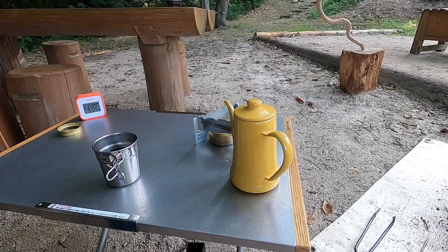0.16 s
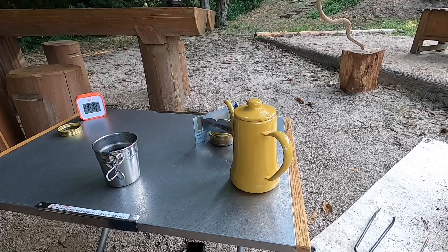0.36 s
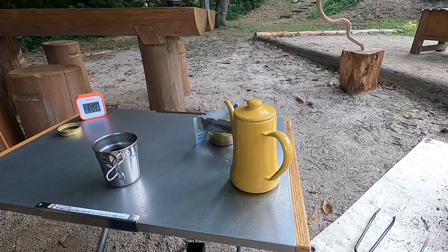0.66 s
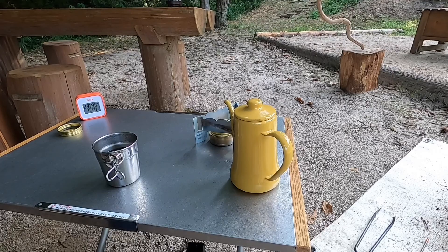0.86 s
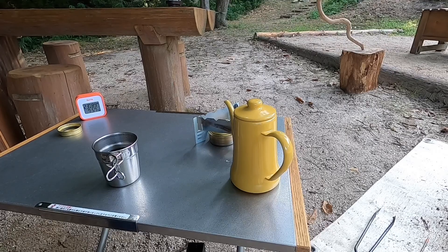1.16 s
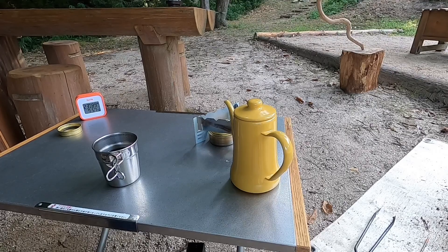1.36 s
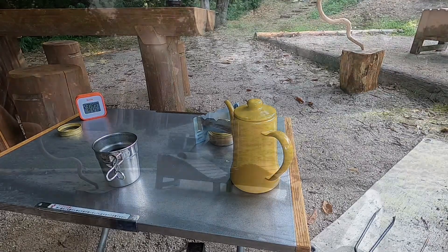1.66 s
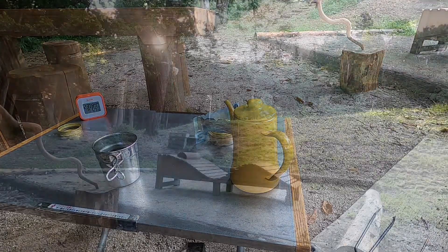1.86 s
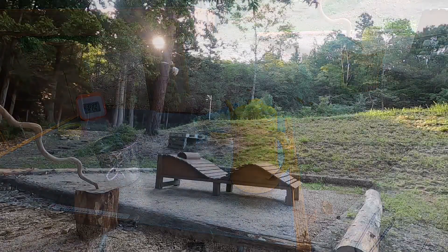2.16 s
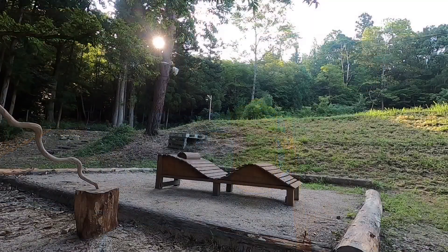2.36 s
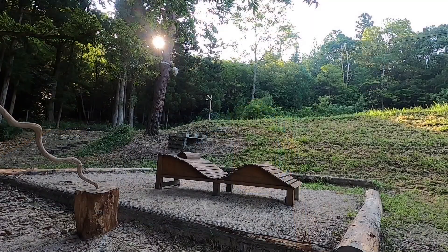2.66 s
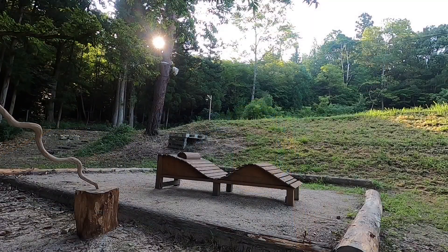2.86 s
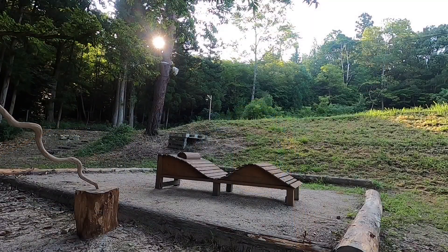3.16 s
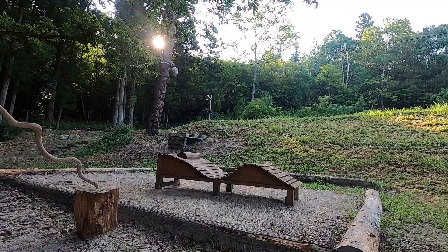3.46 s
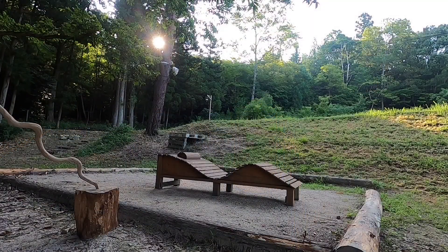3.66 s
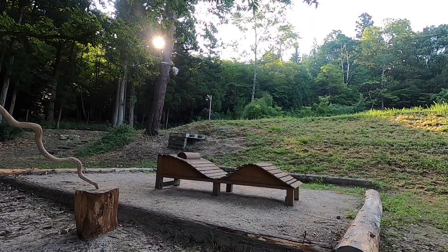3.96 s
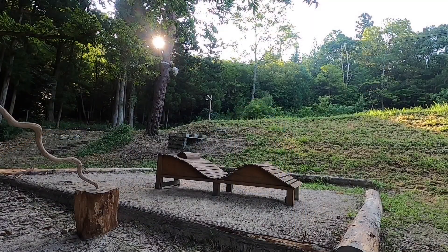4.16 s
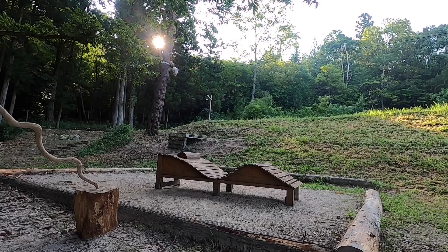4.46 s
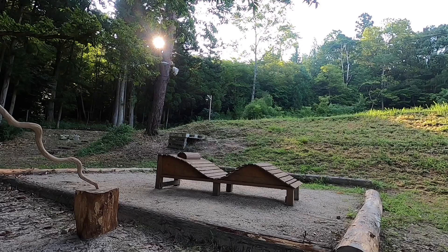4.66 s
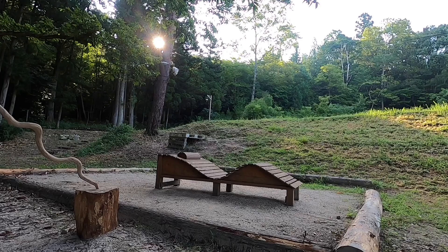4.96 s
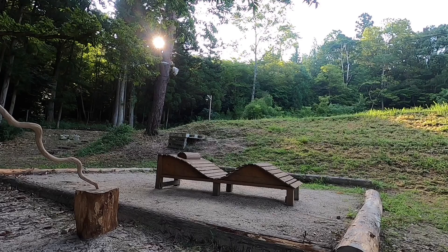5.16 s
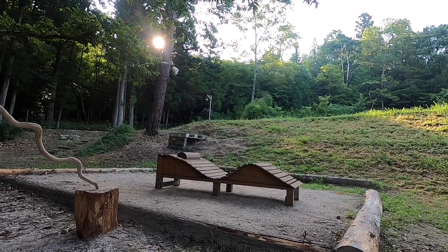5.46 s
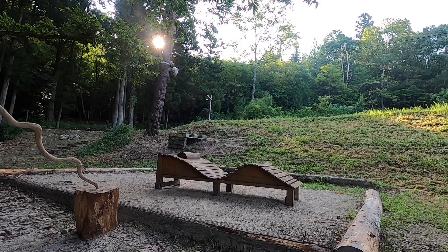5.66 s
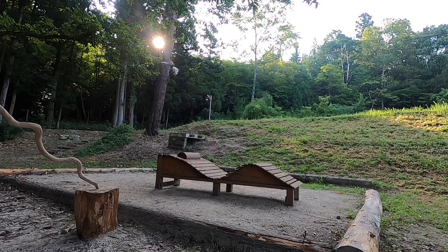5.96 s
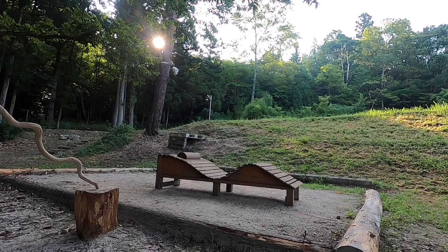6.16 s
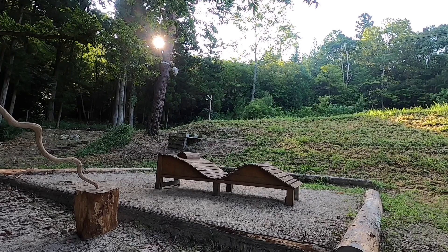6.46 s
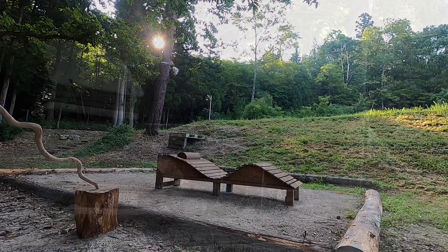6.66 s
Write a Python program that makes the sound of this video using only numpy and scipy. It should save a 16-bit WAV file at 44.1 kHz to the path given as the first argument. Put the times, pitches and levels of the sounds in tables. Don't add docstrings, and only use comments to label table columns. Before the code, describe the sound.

Outdoors in the woods, a dense, high cicada chorus fills the stereo field, with near insects rasping and surging several times a second. It crossfades to a steadier, slightly softer chorus. On the camera microphone a hand makes dry creaks and rubs, mostly left, over deep swaying rumble, while a distant bird whistles short thin chirps.

```python
import sys
import numpy as np
from scipy import signal
from scipy.fft import rfft, irfft
from scipy.io import wavfile
from scipy.ndimage import uniform_filter1d

SR = 44100
rng = np.random.default_rng(int(sys.argv[2]) if len(sys.argv) > 2 else 0)


def volts(x):
    e = np.asarray(x, float) / 20
    return 10 ** e


def to_wav(s):
    ch = np.atleast_2d(s).T
    pcm = np.round(np.clip(ch, -1, 1) * 32767)
    wavfile.write(sys.argv[1], SR, pcm.astype(np.int16))


N = 299880
T = np.arange(N) / SR

# (time [s], share of the table [0-1], share of the clearing [0-1])
DISSOLVE = [
    (0, 1, 0.049),
    (1.4, 1, 0.27),
    (1.9, 0.58, 0.29),
    (2.4, 0.0097, 0.53),
    (6.8, 0.013, 0.96),
]


def table():
    # (time [s], level [dB])
    effort = [
        (0, -25),
        (1.4, -24.5),
        (2.4, -27.5),
    ]
    # (frequency [Hz], level [dB per Hz])
    chorus_colour = [(1760, -64.5), (3000, -60), (3540, -28), (4780, -8.5), (5230, -14.5), (5680, -9),
                     (6740, -6), (7070, -3), (7580, -2), (8000, -1), (8810, -5.5), (10000, -27),
                     (12900, -24), (14700, -32), (15500, -31.5)]
    # (frequency [Hz], level [dB per Hz])
    air_colour = [(12, -40), (20, -5), (40, 0), (59, -29), (92, -40), (119, -18), (161, -6.5), (787, -18.5),
                  (936, -17.5), (1160, -14), (1920, -15.5), (2330, -11), (3600, -16.5), (4680, -41),
                  (7920, -120)]
    # (frequency [Hz], likeness [0-1])
    likeness = [(60, 0.61), (100, 0.24), (180, 0.25), (310, 0.028), (550, 0.14), (950, 0.48), (1650, 0.13),
                (2860, 0.12), (4970, 0.14), (6800, 0.18), (7100, 0.77), (15000, 0.36)]
    # (body [Hz], width [Hz], clicks [per s], evenness [0-1], throbs [per s],
    # first throb [s], throb depth [dB], level [dB])
    singers = [
        (5490, 230, 80, .02, 13.5, 0.084, 19, -37.5),
        (2375, 65, 140, 0.4, 13.5, 0.048, -6, -59),
        (7750, 900, 160, 0, 29, 0.057, 7.5, -33),
    ]
    surging_singers = [
        (4596, 270, 100, 0.83, 11, 0.083, 3.5, -39),
        (5080, 250, 130, 0.52, 14, 0.12, -9, -35.5),
        (5950, 1470, 230, 0.24, 11, 0.062, 1.5, -29),
    ]
    # (start [s], end [s], level [dB])
    surges = [(0.06, 0.15, -29), (0.237, 0.257, -28.5), (.38, .43, -31), (0.548, 0.622, -30),
              (0.76, 0.803, -30), (0.971, 0.983, -28), (1.12, 1.119, -27), (1.194, 1.305, -28.5),
              (1.387, 1.444, -30), (1.605, 1.651, -30), (1.768, 1.854, -33), (1.917, 1.944, -33.5)]
    chorus = volts(curve(effort) + 2.0) * crowd(chorus_colour, likeness, patchy_db=1.4)
    air = volts(-47) * crowd(air_colour, likeness, patchy_db=1.0)
    surge = swells(*np.transpose(surges), rise_db_per_s=87, fall_db_per_s=302).max(1)
    surge = smooth(np.maximum(surge, volts(-35)))
    surging = volts(29.5) * surge * sum(singer(*row) for row in surging_singers)
    return chorus + air + surging + sum(singer(*row) for row in singers)


def clearing():
    # (time [s], level [dB])
    effort = [
        (1.4, -60),
        (1.91, -23.5),
        (4.0, -25.5),
        (6.3, -28),
        (6.8, -30.5),
    ]
    # (frequency [Hz], level [dB per Hz])
    chorus_colour = [(2060, -48.5), (3500, -36.5), (4840, -26), (5110, -21), (5550, -19), (6160, -8),
                     (6800, -2.5), (7150, -3), (7610, -1.5), (8620, -6), (9470, -19), (10500, -30.5),
                     (11200, -55.5), (12700, -41.5), (14500, -38), (15500, -35.5)]
    # (frequency [Hz], level [dB per Hz])
    air_colour = [(35, -15), (60, -31), (114, -8.5), (267, -3.5), (381, -18), (417, -12), (563, -16.5),
                  (960, -15), (1210, -13.5), (1370, -14), (2420, -22.5), (2890, -27), (4200, -36.5),
                  (5460, -55), (9240, -120)]
    # (frequency [Hz], likeness [0-1])
    likeness = [(60, 0.87), (100, 0.41), (180, 0.71), (310, 0.59), (550, 0.25), (950, 0.33), (1650, 0.18),
                (2860, 0.24), (4970, 0.085), (6800, 0.2), (7100, 0.99), (15000, 1)]
    # (body [Hz], width [Hz], clicks [per s], evenness [0-1], throbs [per s],
    # first throb [s], throb depth [dB], level [dB])
    singers = [(6160, 100, 145, .1, .16, 3.4, 12, -40), (6350, 220, 139, .1, .16, 5.9, 12, -39),
               (5540, 170, 85, .1, .2, 3.4, 14, -46), (5200, 260, 78, .1, .13, 5.6, 14, -49),
               (5890, 90, 110, .1, .2, 5.9, 8, -45), (5700, 700, 110, .2, .2, 5.9, 14, -41),
               (7600, 900, 96.7, .3, 9.9, .05, 3, -33), (8000, 900, 118, .3, 27.5, .02, 3, -34),
               (4800, 500, 95, .2, .22, 5.88, 30, -54)]
    chorus = volts(curve(effort) + 4.5) * crowd(chorus_colour, likeness, patchy_db=0.3)
    air = volts(-47) * crowd(air_colour, likeness, patchy_db=1.56)
    return chorus + air + sum(singer(*row) for row in singers)


def crowd(colour, same, patchy_db):
    # (frequency [Hz], left minus right [dB])
    pair_lean = [(60, 0.5), (150, -1), (380, -1.5), (950, 1), (2380, 6), (5980, 1.5), (15000, 0.5)]
    hz = np.fft.rfftfreq(1024, 1 / SR)
    a, b, c, d, patches = rng.standard_normal((N // 256 + 5, 513, 5)).T
    patches = uniform_filter1d(patches, size=10, axis=0)
    patches = evened(uniform_filter1d(patches, size=12, axis=1))
    like = np.clip(read(same, hz), 0, 1)[:, None]
    left = a + 1j * b
    right = like * left + np.sqrt(1 - like ** 2) * (c + 1j * d)
    z = np.array([left, right])
    z *= volts(read(colour, hz)[:, None] + patchy_db * patches)
    z *= volts(np.array([.5, -.5])[:, None, None] * read(pair_lean, hz)[:, None])
    return evened(signal.istft(z, nperseg=1024, noverlap=768)[1][:, :N])


def singer(hz, width, clicks, even, throbs, first, depth_db, db):
    pace = clicks * (1 + .003 * evened(uniform_filter1d(rng.standard_normal(N), size=8000)))
    turns = np.cumsum(pace) / SR
    snaps = evened(np.diff(np.floor(turns), prepend=0))
    buckling = 0.56 + np.exp(-(turns % 1) / 0.93)
    near, side = buckling * rng.standard_normal((2, N))
    drive = even * snaps + (1 - even) * near + 0.62 * np.array([side, -side])
    pump = volts(depth_db / 2 * np.cos(2 * np.pi * throbs * (T - first)))
    song = evened(pump * resonate(drive, hz, 0.75 * width))
    return volts(db) * song * volts(np.array([[1.], [-1.]]) * 0.56)


def grip():
    # (time [s], peak [dB], main ring [Hz], bright snap [dB])
    first_squeeze = [(2.043, -38, 1920, -29), (2.0815, -31, 1340, -12), (2.138, -31, 1890, -9),
                     (2.2376, -27.5, 1610, 0), (2.3024, -28.5, 2250, -12), (2.3453, -27, 1740, -5),
                     (2.382, -25.5, 1830, -4), (2.3959, -29, 1150, -23), (2.4069, -28, 2265, -16),
                     (2.4419, -27.5, 2020, -2), (2.483, -28, 1600, -12), (2.4935, -34, 1500, -10),
                     (2.5074, -33, 2410, 2), (2.517, -29, 2400, 8), (2.5256, -22, 2660, 12.5),
                     (2.5713, -33, 2000, -21), (2.614, -41, 1660, -8), (2.648, -40, 2400, -5),
                     (2.6716, -35, 2030, 0), (2.8405, -28.5, 1050, -7)]
    second_squeeze = [(3.0092, -40.5, 1280, -21), (3.0423, -37, 1680, -19), (3.0628, -31, 2920, -9),
                      (3.0889, -35, 1940, -11), (3.1225, -49, 2130, -12), (3.1273, -35.5, 2380, -12),
                      (3.1662, -31.5, 1960, -1), (3.1754, -34.5, 2664, 7), (3.2435, -31, 1290, -9),
                      (3.2889, -31, 1990, 4), (3.3264, -32.5, 1600, -10), (3.387, -37, 1100, -10),
                      (3.4311, -32, 2680, -14), (3.4766, -30.5, 2700, 1), (3.4837, -41, 2280, 2),
                      (3.5154, -37, 1700, -11), (3.5583, -36, 2630, -8)]
    third_squeeze = [(3.9646, -47, 2500, 0), (4, -33, 1330, -19), (4.0322, -36.5, 2030, -12),
                     (4.0449, -28, 2670, 4), (4.0679, -31, 1960, -11), (4.1131, -37, 2356, -3),
                     (4.178, -39, 1820, -15), (4.2222, -27, 2680, 4), (4.2438, -38, 1334, -16),
                     (4.256, -45, 2118, -1), (4.2695, -43, 2090, -4), (4.3763, -37.5, 3600, 12),
                     (4.81, -42, 3090, 6), (6.0519, -41, 3900, 17)]
    # (slips, time to fall 60 dB [s], low knock [dB])
    squeezes = [(first_squeeze, 0.034, -29), (second_squeeze, 0.018, -12), (third_squeeze, 0.0087, -9.5)]
    # (start [s], end [s], level [dB], low part [dB])
    strokes = [(2.067, 2.072, -43.5, -58), (2.273, 2.582, -46, -52.5), (2.41, 2.42, -55, -43.5),
               (2.843, 2.891, -47.5, -50.5), (3.017, 3.31, -47.5, -52.5), (3.35, 3.572, -42.5, -43),
               (4.047, 4.077, -43.5, -43.5), (4.234, 4.254, -45.5, -44.5), (4.709, 4.802, -53, -81),
               (5.103, 5.24, -57.5, -58)]
    # (frequency [Hz], level [dB per Hz])
    rub_colour = [(530, -37), (900, -13), (1180, -2), (1780, -0.5), (2350, 0.5), (2680, 0.5), (4870, 1),
                  (5500, 0.5), (7150, -21), (12100, -120)]
    creaks = np.zeros(N)
    for slips, t60, low_db in squeezes:
        for s, *row in slips:
            add(creaks, s, slip(*row, t60, low_db))

    grit = rng.standard_normal((2, N)) * volts(5.7 * np.minimum(rng.exponential(1, (2, N)), 5))
    hz = np.fft.rfftfreq(N, 1 / SR)
    start, end, db, low_db = np.transpose(strokes)
    slide = swells(start, end, db + 3.5, rise_db_per_s=65.5, fall_db_per_s=91)
    press = volts(low_db - 1.0) * (slide / volts(db + 6.5)) ** 1.65
    rub = smooth(slide.max(1)) * evened(irfft(rfft(grit[0]) * volts(read(rub_colour, hz)), N))
    low = smooth(press.max(1)) * evened(resonate(grit[1], 340, 710))

    left = creaks + rub * np.clip((T - 1.95) / 0.14, 0, 1)
    around = rng.standard_normal(600) * np.exp(-np.arange(600) / 1900.0)
    around /= np.linalg.norm(around)
    far_side = left * (1 + 1.5 * evened(uniform_filter1d(rng.standard_normal(N), size=400)))
    right = 0.16 * left + 0.36 * signal.oaconvolve(far_side, around)[:N]
    return np.array([volts(4.0) * left, right]) + volts(2.5) * pan(low, lean_db=5.0)


def slip(db, hz, bright_db, t60, low_db):
    # (frequency [Hz], level [dB])
    shell = [(1050, -37.5), (1240, -7), (1600, -10), (1880, -11), (2220, -0.5), (3000, -7.5), (3680, 3.5),
             (4060, 3.5), (4620, 0.5)]
    scrape_s = 0.0015
    t = np.arange(1600) / SR
    scrape = rng.standard_normal(len(t)) * t / scrape_s * np.exp(1 - t / scrape_s)
    scrape[30] += 10.5
    longer, *colour = rng.standard_normal(1 + len(shell))
    rings = [(hz, 2.5)]
    for (ring_hz, ring_db), c in zip(shell, colour):
        rings.append((ring_hz, ring_db + 2.0 * c + bright_db * (ring_hz > 2600)))
    ringing = sum((-1) ** k * volts(d) * np.sin(2 * np.pi * f * t) for k, (f, d) in enumerate(rings))
    ringing = ringing * volts(-60 * t / (t60 * volts(1.2 * longer)))
    body = evened(signal.fftconvolve(scrape, ringing)[:len(t)])
    body += 1.27 * evened(resonate(scrape, 1820, 1550))
    body += volts(bright_db - 4.0) * evened(resonate(scrape, 4100, 1700))
    knock = np.sin(2 * np.pi * 450 * t) * volts(low_db - 60 * t / 0.016)
    return volts(db + 7.5) * (body / abs(body).max() + knock)


def mount():
    # (start [s], end [s], level [dB], pitch [Hz])
    pushes = [(0, 0.027, -50.5, 33.8), (0.368, 0.407, -50, 34.7), (.95, 1.2, -58, 38.3),
              (1.387, 1.427, -50.5, 38), (1.55, 1.799, -55, 35.1), (1.925, 1.984, -43.5, 32.87),
              (2.149, 2.39, -33.5, 32.76), (2.456, 2.754, -34, 33.27), (2.918, 3.283, -38.5, 34.04),
              (3.362, 3.744, -30, 34.54), (3.802, 3.907, -31.5, 34), (3.998, 4.226, -36.5, 32.52),
              (4.3, 4.308, -31, 32.5), (4.389, 4.46, -35.5, 28.5), (4.523, 4.565, -37.5, 29.34),
              (4.714, 4.744, -46, 29.7), (5.078, 5.144, -41, 33.76), (5.2, 5.25, -41.5, 33.8),
              (5.386, 5.406, -42, 30.8), (5.793, 5.914, -41, 36.87), (6.05, 6.134, -35, 37.06),
              (6.32, 6.358, -36, 37.3), (6.496, 6.567, -41, 36.4), (6.63, 6.704, -37, 39)]
    # (start [s], end [s], level [dB])
    jolts = [(4.3, 3.4, -44), (4.58, 4.24, -38), (4.965, 5.01, -35), (5.277, 5.301, -39.5),
             (5.5, 5.513, -39.5), (5.852, 5.7, -44), (6.2, 6.17, -28)]
    start, end, db, hz = np.transpose(pushes)
    swaying = swells(start, end, db, rise_db_per_s=170, fall_db_per_s=230)
    level = smooth(swaying.max(1))
    pitch = smooth(swaying @ hz / swaying.sum(1))
    turn = 2 * np.pi * np.cumsum(pitch) / SR
    sway = np.sqrt(2) * level * (np.sin(turn) + 0.077 * np.sin(2 * turn + 0.5))
    wobble = 0.51 * level * evened(resonate(rng.standard_normal(N), 26.4, 29))
    shudder = evened(resonate(rng.standard_normal(N), 38, 64))
    jolt = smooth(swells(*np.transpose(jolts), rise_db_per_s=247, fall_db_per_s=247).max(1))
    shaken = sway + wobble + (volts(-18.5) * level + volts(-7.0) * jolt) * shudder
    return pan(shaken, lean_db=1.5)


def bird():
    # (start [s], length [s], from [Hz], furthest [Hz], share of an arch [0-1], level [dB])
    chirps = [(2.485, .1, 3680, 3950, .75, -45), (2.59, .05, 3850, 4050, .5, -53),
              (3.11, .1, 4250, 4500, .5, -52.5), (3.828, .125, 3680, 3830, .7, -52.5),
              (4.232, .035, 4480, 4580, .6, -53), (4.318, .1, 3850, 4320, .55, -57),
              (4.51, .06, 4300, 4380, .6, -59), (4.606, .07, 3760, 4390, .8, -49.5),
              (5.055, .04, 4500, 4000, .5, -60), (5.08, .035, 3560, 3660, .6, -57),
              (5.122, .03, 3700, 3560, .5, -56), (5.155, .03, 3500, 3700, .5, -61),
              (5.07, .03, 4100, 3950, .5, -62)]
    out = np.zeros(N)
    for start, length, from_hz, to_hz, arch, db in chirps:
        u = np.arange(0, 1, 1 / (SR * length))
        hz = from_hz + (to_hz - from_hz) * np.sin(arch * np.pi * u ** .75)
        tone = np.sqrt(2) * np.sin(2 * np.pi * np.cumsum(hz) / SR)
        add(out, start, tone * volts(db + 1 - 2.5 * u) * signal.windows.tukey(len(u), .25))
    out *= 1 + .3 * evened(uniform_filter1d(rng.standard_normal(N), size=90))
    trees = rng.standard_normal(6000) * volts(-60 * np.arange(6000) / SR / .15)
    wash = signal.oaconvolve(out, trees / np.linalg.norm(trees))[:N]
    return pan(out + volts(-6) * wash, lean_db=8)


def hums():
    # (start [s], end [s], pitch [Hz], level [dB])
    low_tones = [
        (2.377, 2.528, 171.3, -47),
        (3.001, 3.903, 130, -53.5),
        (5.052, 6.004, 149, -58.5),
    ]
    out = np.zeros(N)
    for start, end, hz, db in low_tones:
        t = np.arange(start, end, 1 / SR)
        add(out, start, volts(db) * np.sin(2 * np.pi * hz * t) * signal.windows.tukey(len(t), .6))
    return pan(out, lean_db=-7.5)


def next_place():
    # (start [s], centre [Hz], width [Hz], level [dB])
    murmur = (6.5, 491, 399, -52)
    start, hz, width, db = murmur
    air = [evened(resonate(x, hz, width)) for x in rng.standard_normal((2, N))]
    return volts(db) * np.array(air) * np.clip((T - start) / (T[-1] - start), 0, 1)


def evened(x):
    return x / np.sqrt(np.mean(x ** 2) + 1e-20)


def read(points, hz):
    f, value = np.transpose(points)
    return np.interp(np.log(hz + 1), np.log(f + 1), value)


def curve(rows, axis=1):
    rows = np.array(rows)
    return np.interp(T, rows[:, 0], rows[:, axis])


def swells(start, end, db, rise_db_per_s, fall_db_per_s):
    t = T[::100, None]
    early, late = np.maximum(start - t, 0), np.maximum(t - end, 0)
    return volts(db - rise_db_per_s * early - fall_db_per_s * late)


def smooth(slow):
    return np.interp(T, T[::100], slow)


def add(mix, s, sound):
    part = mix[round(s * SR):][:len(sound)]
    part += sound[:len(part)]


def resonate(x, hz, width):
    peak = signal.iirpeak(hz, hz / width, SR)
    return signal.lfilter(*peak, signal.lfilter(*peak, x))


def pan(x, lean_db):
    return x * volts(np.array([[lean_db / 2], [-lean_db / 2]]))


def scene():
    places = curve(DISSOLVE) * table() + curve(DISSOLVE, axis=2) * clearing() + next_place()
    return places + mount() + hums() + grip() + bird()


def joined(z, hz, t):
    # (time [s], frequency [Hz])
    joint_from = [(0, 6890), (1.72, 6890), (1.74, 6300), (5.6, 6300), (5.62, 6890)]
    # (frequency [Hz], usual lean [dB], spread [dB])
    joint_lean = [(4500, 1.5, 1.5), (6500, 3.2, 1.8), (7200, 2.4, 1.5), (8600, 2, 2.5), (9600, 1, 1.6),
                  (10300, .1, .35), (15600, 0, .3)]
    # (start [s], end [s], share of the lean left [0-1])
    squeezed = [(.05, .125, 0), (.22, .26, .5), (.39, .43, .5), (.55, .59, 0), (.76, .8, .5),
                (.96, .99, .5), (1.09, 1.12, .5), (1.2, 1.285, 0), (1.385, 1.425, 0), (1.59, 1.64, .5),
                (2.9, 2.93, .3), (5.55, 5.575, .4), (5.64, 5.67, .4), (5.765, 5.885, 0), (6.14, 6.3, 0),
                (6.41, 6.485, 0), (6.6, 6.63, 0)]
    # (time [s], length [s], low edge [Hz], high edge [Hz])
    inverted = [(.065, .05, 8300, 10300), (1.25, .05, 7600, 10300), (1.393, .03, 7600, 8270),
                (5.79, .065, 8300, 9600), (6.23, .02, 6900, 7600), (6.45, .055, 6900, 7600),
                (6.42, .045, 9000, 9600), (.232, .025, 9000, 9600), (.488, .025, 9000, 9600),
                (1.17, .03, 9000, 9600), (4.226, .025, 9000, 9600), (5.968, .025, 9000, 9600)]
    # (time [s], stray [spreads])
    flip_rarity = [
        (0, .95),
        (1.9, 1.05),
        (2.3, 1.5),
    ]
    band = (hz / 689).astype(int)
    drifts = rng.standard_normal((2, band[-1] + 1, len(t)))
    lean, flip = (evened(uniform_filter1d(v, size=3, axis=1))[band] for v in drifts)
    usual_db, spread_db = (read(np.array(joint_lean)[:, [0, k]], hz)[:, None] for k in (1, 2))
    step_db = 1.5
    lean_db = step_db * np.round((usual_db + spread_db * lean) / step_db)
    from_hz = np.interp(t, *np.transpose(joint_from))
    for start, end, left in squeezed:
        short = (t > start) & (t < end)
        from_hz = np.where(short, 4500, from_hz)
        lean_db = lean_db * np.where(short, left, 1)
    mid = z.mean(0)
    leaning = mid * np.tanh(lean_db * np.log(10) / 40)
    side = np.where(hz[:, None] > from_hz, leaning, z[0] - mid)
    flipped = (flip > np.interp(t, *np.transpose(flip_rarity))) & (hz[:, None] > 9600)
    for s, length, low_hz, high_hz in inverted:
        flipped = flipped | np.outer((hz > low_hz) & (hz < high_hz), abs(t - s) < length / 2)
    mid, side = np.where(flipped, side, mid), np.where(flipped, mid, side)
    return np.array([mid + side, mid - side])


def low_pass(x):
    return signal.sosfilt(signal.butter(12, 15620, fs=SR, output="sos"), x)


def record(dry):
    # (frequency [Hz], at the table [dB under mean], in the clearing [dB under mean])
    hidden = [(860, -31.5, -34), (1600, -20, -28), (2970, -21.5, -27), (4500, -19.5, -22.5),
              (5200, -35, -37), (8950, -19, -16.5), (11700, -17.5, -17), (10700, -25, -29.5),
              (12600, -17, -30), (15000, -29, -26.5), (15600, -23.5, -23)]
    lead = 864
    frame = dict(fs=SR, window="cosine", nperseg=2048, noverlap=1024)
    hz, t, z = signal.stft(np.pad(dry, [(0, 0), (lead, 0)]), **frame)
    t = t - lead / SR
    band = np.floor(np.cumsum(hz[1] / np.clip(0.026 * hz, 86, 690))).astype(int)
    edges = np.flatnonzero(np.diff(band, prepend=-1))
    power = (abs(z) ** 2).mean(0) + 1e-20
    power /= power.mean(0)
    band_db = 10 * np.log10(np.add.reduceat(power, edges) / np.bincount(band)[:, None])
    at_table = np.interp(t, T, curve(DISSOLVE))
    table_db, clearing_db = (read(np.array(hidden)[:, [0, k]], hz) for k in (1, 2))
    hidden_db = np.outer(table_db, at_table) + np.outer(clearing_db, 1 - at_table)
    budget_db = 2.6 * evened(uniform_filter1d(rng.standard_normal(band_db.shape), size=2, axis=1))
    z = z * ((band_db + budget_db)[band] > hidden_db)
    z = z * (power > volts(2 * hidden_db - 2.5))
    z = joined(z, hz, t)
    return low_pass(signal.istft(z, **frame)[1][:, lead:lead + N])


dry = scene()
out = record(dry)
to_wav(out)
```